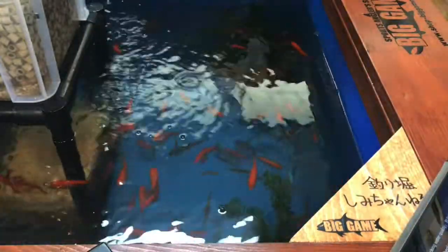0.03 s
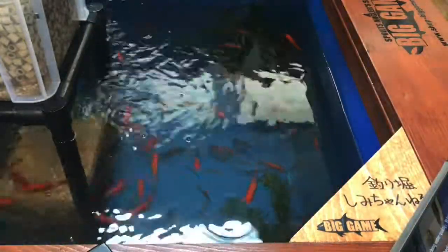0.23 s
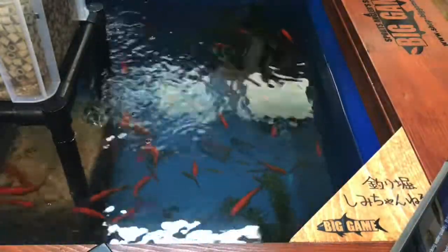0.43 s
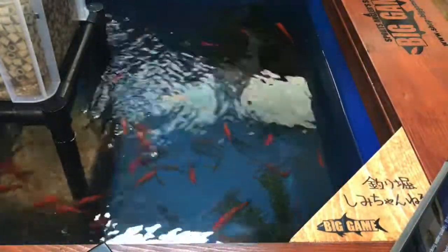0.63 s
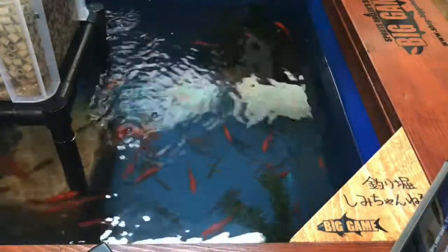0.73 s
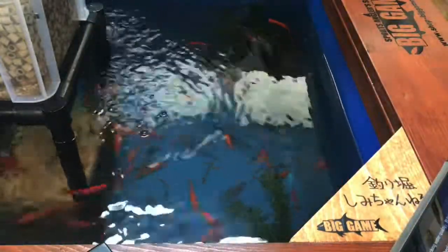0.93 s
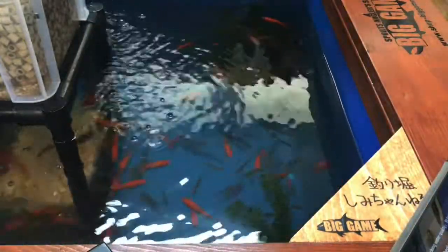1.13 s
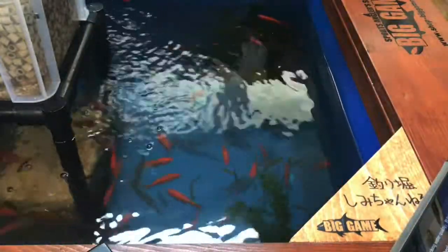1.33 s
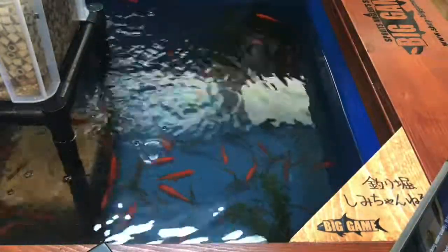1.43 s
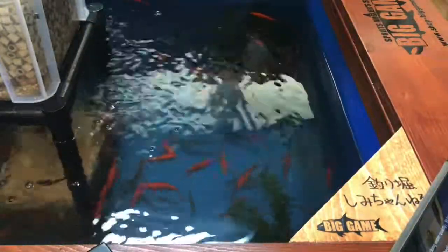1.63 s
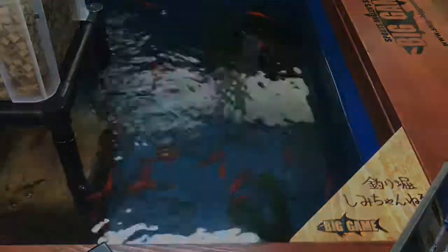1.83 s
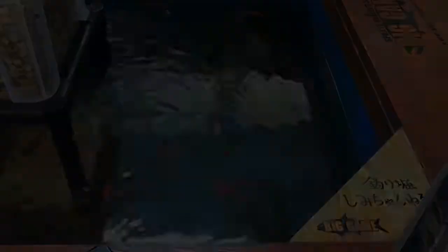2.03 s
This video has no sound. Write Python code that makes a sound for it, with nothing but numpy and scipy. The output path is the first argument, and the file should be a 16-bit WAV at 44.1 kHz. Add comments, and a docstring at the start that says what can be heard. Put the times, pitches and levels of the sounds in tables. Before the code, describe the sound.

Water trickles softly from a filter into an indoor fish pond, with a light splashy rush in the first 0.3 seconds. Fine fizz, ticking droplets and small plinking bubbles continue throughout, over churning water and a pump's steady low hum and faint buzz. A few deeper gurgles come between 1.0 and 1.3 seconds. Everything then fades, dying away at about 2.1 seconds.

```python
"""At an indoor fish pond, water trickles from a filter onto the surface.
A mains-driven pump hums and its housing buzzes at harmonics of the supply, over the tank's low rumble.
Water churns in the filter and spills with a broad rush and a fine fizz. Droplets tick on impact, and
trapped bubbles ring as damped oscillators: small ones plink, big ones gurgle. The room adds a short
reverberation, and the whole sound fades away at the end."""
import sys
import numpy as np
from scipy import signal
from scipy.fft import rfft, irfft, next_fast_len
from scipy.io import wavfile
from scipy.ndimage import map_coordinates

SR = 44100
rng = np.random.default_rng(int(sys.argv[2]) if len(sys.argv) > 2 else 0)


def dump_mix(stems):
    """Bounce the given channels to the path in sys.argv[1] as a 16-bit WAV at rate SR."""
    frames = np.atleast_2d(stems).T  # one column per channel
    limited = np.clip(frames, -1, 1)  # hard clip at full scale
    pcm = np.round(limited * 32767).astype(np.int16)
    wavfile.write(sys.argv[1], SR, pcm)


N = 92610
T = np.arange(N) / SR
MAINS_HZ = 50.03


def amp(db):
    """Amplitude ratio of a level in decibels."""
    return 10 ** (np.asarray(db) / 20)


def unit(x):
    """Normalisation to rms 1."""
    return x / np.sqrt(np.mean(x ** 2) + 1e-20)


def along(points, hz):
    """Interpolation of (frequency, value) points on a logarithmic frequency axis."""
    f, v = np.transpose(points)
    return np.interp(np.log(hz + 1), np.log(f + 1), v)


def wobble(knots_per_s):
    """Smooth random modulation: a spline through Gaussian values."""
    return map_coordinates(rng.standard_normal(int(N * knots_per_s / SR) + 4), [T * knots_per_s])


def filtered(x, response):
    """Linear filtering: the spectrum of x times a frequency response."""
    size = next_fast_len(N + SR // 2)
    return irfft(rfft(x, size) * response(np.fft.rfftfreq(size, 1 / SR)), size)[:N]


def coloured(x, spectrum):
    """Spectral shaping of x, returned at rms 1."""
    return unit(filtered(x, lambda hz: amp(along(spectrum, hz))))


def bubbles(onset_s, db, hz, cycles, attack_s, samples):
    """Bubble resonance: sines that decay 60 dB in `cycles` periods while their pitch rises 7.1 %."""
    t = np.arange(samples) / SR
    age = t * hz[:, None] / cycles
    ring = np.sin(2 * np.pi * hz[:, None] * t * (1 + 0.071 * np.minimum(age, 1) / 2))
    ring *= amp(db[:, None] - 60 * age) * (1 - np.exp(-t / attack_s))
    where = np.round(onset_s * SR).astype(int)[:, None] + np.arange(samples)
    return np.bincount(where.ravel(), ring.ravel(), N)[:N]


def swarm(per_s, low_hz, high_hz, spread_db, cycles, samples):
    """Superposition of bubbles at random times and pitches, most of them weak; rms 1."""
    when, pitch, strength = rng.random((int(per_s * N / SR), 3)).T
    db = -spread_db * np.log(np.maximum(strength, .01))
    hz = low_hz * (high_hz / low_hz) ** pitch
    return unit(bubbles(when * N / SR, db, hz, cycles, 1 / high_hz, samples))


def mains_harmonics(partials, waver_db, knots_per_s):
    """A harmonic series on the mains frequency, each partial wavering in level."""
    return np.sqrt(2) * sum(amp(db + waver_db * wobble(knots_per_s))
                            * np.sin(2 * np.pi * (order * MAINS_HZ * T + rng.random()))
                            for order, db in partials)


# reverberation time of the room (frequency [Hz], T60 [s])
ROOM_T60 = [(200, 0.39), (2500, 0.15), (8000, 0.19), (16000, 0.043)]
def room(x, wet_db):
    """Reverberation: x plus its decaying tail, which differs from one spot of the pond to the next."""
    out = x.copy()
    for centre_s in np.arange(9) / 4:
        hz, t, noise = signal.stft(rng.standard_normal(SR // 3), SR, nperseg=256)
        decay = amp(-60 * t / along(ROOM_T60, hz)[:, None])
        tail = signal.istft(noise * decay, SR, nperseg=256)[1]
        crossfade = np.clip(1 - abs(T - centre_s) * 4, 0, 1)
        out += amp(wet_db) * signal.fftconvolve(x * crossfade, tail / np.linalg.norm(tail))[:N]
    return out


# partials of the pump's hum and of its housing's buzz (harmonic number [-], level [dB])
HUM_PARTIALS = [(1, -62), (2, -49.5), (3, -80.5), (4, -75), (5, -65.5)]
BUZZ_PARTIALS = [(8, -80.5), (9, -72.5), (10, -80), (11, -75), (12, -88), (13, -73.5), (14, -71.5),
                 (15, -81.5), (16, -87.5), (17, -81), (18, -78), (19, -81.5), (20, -75), (21, -73.5),
                 (22, -76.5), (24, -75), (25, -78.5), (26, -79), (28, -75.5), (29, -85), (30, -82),
                 (34, -88.5), (36, -90), (38, -89), (46, -103), (48, -85)]
# spectrum of the tank's rumble (frequency [Hz], relative level [dB])
RUMBLE_SPECTRUM = [(20, -28), (32, -14), (44, -14.5), (59, 2), (68, -7), (82, -15.5), (118, -12.5),
                   (150, -25.5), (200, -34), (400, -51.5)]
# swell of hum and rumble together (time [s], gain [dB])
DEEP_SWELL = [(0, 0), (.2, -.5), (.6, 1.1), (.8, -1.5), (.95, 1.9), (1.08, 0), (1.19, 2.5), (1.33, -1),
              (1.7, 0), (2.1, -3.5)]
def pump():
    """Forced vibration: pump and housing sound at mains harmonics over the rumble of the tank."""
    rumble = amp(-52) * coloured(rng.standard_normal(N), RUMBLE_SPECTRUM)
    hum = mains_harmonics(HUM_PARTIALS, waver_db=0.53, knots_per_s=4.9)
    buzz = mains_harmonics(BUZZ_PARTIALS, waver_db=2.5, knots_per_s=7.15)
    swell = amp(np.interp(T, *np.transpose(DEEP_SWELL)))
    return swell * (hum + rumble) + buzz


# spectrum of the water in the filter (frequency [Hz], relative level [dB])
CHURN_SPECTRUM = [(100, -24), (170, 1), (235, 1), (300, -8), (410, -5), (510, 1), (620, -1.5), (780, -5.5),
                  (1080, -4), (1450, -4.5), (1750, -12.5), (2100, -18), (4000, -21), (16000, -88)]
def churn():
    """Amplitude modulation: the pump's stroke pulses the noise and low bubbles of churning water."""
    gurgle = swarm(per_s=500, low_hz=246.7, high_hz=1688, spread_db=0.5, cycles=18.5, samples=2500)
    stroke = amp(4.2 * np.cos(np.pi * MAINS_HZ * T) ** 10 + 0.85 * wobble(16))  # once a mains cycle
    water = rng.standard_normal(N) + amp(-15) * gurgle
    return amp(-60) * coloured(stroke * water, CHURN_SPECTRUM)


# envelope of the splashing (time [s], level [dB])
WASH_ENVELOPE = [(0, -70), (.1, -64.5), (.26, -67), (.45, -73), (.62, -72), (.88, -73), (1.2, -76),
                 (2.1, -73)]
# its spectrum (frequency [Hz], relative level [dB])
WASH_SPECTRUM = [(800, -11), (1800, -4.5), (3500, -2), (6700, 1), (9000, -4), (16000, -13.5)]
def wash():
    """Broadband noise of water spilling onto the surface, strongest near the start."""
    level_db = np.interp(T, *np.transpose(WASH_ENVELOPE)) + 1.36 * wobble(30)
    return amp(level_db) * coloured(rng.standard_normal(N), WASH_SPECTRUM)


# strength of the spray (time [s], fizz gain [dB], spatter gain [dB])
SPRAY_GAINS = [(0, 1, -2), (.15, .5, -3), (.4, 0, 1), (.6, -2.5, 1.5), (1.0, -1.5, 1), (1.3, -1.5, 2),
               (1.6, -1, 0.5), (2.1, -2, -0.5)]
# spectrum of its fizz (frequency [Hz], relative level [dB])
FIZZ_SPECTRUM = [(700, -11), (2000, -5.5), (2500, 5), (2850, -9), (3400, -4), (4200, -8.5), (5400, -7),
                 (6700, -3.5), (7600, -9), (8600, 1.5), (10400, -4.5), (11800, 2.5), (13300, 3.5),
                 (14400, 4.5), (15800, 4)]
def fizz():
    """Incoherent summation: countless tiny bubbles burst in the smooth hiss of fine spray."""
    times, gain_db, _ = np.transpose(SPRAY_GAINS)
    hiss = amp(-61) * coloured(rng.standard_normal(N), FIZZ_SPECTRUM)
    pops = swarm(per_s=1300, low_hz=3970, high_hz=15300, spread_db=2.5, cycles=12.7, samples=160)
    envelope = amp(np.interp(T, times, gain_db) + 0.28 * wobble(15) + 0.65 * wobble(110))
    return envelope * (hiss + amp(-69.5) * coloured(pops, FIZZ_SPECTRUM))


def tick(db, hz, rise_s=0.00027, t60_s=0.0078, width_hz=1600, splat=0.17):
    """Impact transient of one droplet: a noise burst with a resonance peak and a weaker broad splat."""
    t, f = np.arange(512) / SR, np.fft.rfftfreq(512, 1 / SR)
    resonance = 1 / (1 + (2 * (f - hz) / width_hz) ** 2)
    colour = (resonance + splat) * f / (f + 2500)
    noise = unit(irfft(rfft(rng.standard_normal(len(t))) * colour))
    envelope = (1 - np.exp(-t / rise_s)) ** 2 * amp(-60 * t / t60_s)
    return amp(db) * envelope / envelope.max() * noise


# loud droplets striking the surface (time [s], level [dB], frequency [Hz])
DROPLET_IMPACTS = [(0.047, -50, 14000), (0.2562, -50, 9500), (0.258, -49, 8800), (.728, -51, 14300),
                   (.8305, -53, 14000), (.8654, -50, 13200), (.8869, -51.5, 13500), (.9318, -56, 14500),
                   (0.977, -55, 12200), (1.0555, -46, 13600), (1.144, -58, 12070), (1.2875, -50, 12900),
                   (1.4765, -52, 9000), (1.492, -50, 14200), (1.5425, -49.5, 9100), (1.667, -52, 11100),
                   (1.797, -55.5, 11100)]
def droplets(per_s=120, low_hz=7660, high_hz=15350):
    """Shot noise: a dense random spatter of small impacts, with a few loud ones among them."""
    times, _, gain_db = np.transpose(SPRAY_GAINS)
    when, strength, pitch = rng.random((int(per_s * N / SR), 3)).T
    onset_s = when * N / SR
    level_db = -65 + np.interp(onset_s, times, gain_db) - 2 * np.log(np.maximum(strength, .05))
    spatter = zip(onset_s, level_db, low_hz + pitch * (high_hz - low_hz))
    out = np.zeros(N + SR)
    for start, db, hz in [*DROPLET_IMPACTS, *spatter]:
        burst = tick(db, hz)
        out[round(start * SR):][:len(burst)] += burst
    return room(out[:N], wet_db=-8.5)


# small bubbles that plink and big ones that gurgle (time [s], level [dB], frequency [Hz])
SMALL_BUBBLES = [(0.044, -54, 2477), (.058, -58.5, 1670), (0.216, -51, 2540), (.345, -53, 5140),
                 (.378, -59, 2500), (.574, -60, 4350), (.6404, -48.5, 3390), (0.641, -55, 2410),
                 (0.7695, -56, 2426), (0.885, -56, 2600), (0.9106, -47.5, 4750), (1.0271, -53, 2410),
                 (1.041, -55.5, 2370), (1.265, -56.5, 3550), (1.33, -49, 7040), (1.375, -51, 6100),
                 (1.448, -56, 3570), (1.5678, -58, 2436), (1.724, -56, 3400), (1.871, -52, 3350),
                 (1.905, -53.5, 2394), (1.908, -52, 5400), (2.026, -50, 4450)]
BIG_BUBBLES = [(.135, -55, 560), (1.022, -49, 498), (1.18, -50, 507), (1.24, -53, 646)]
def trickle():
    """Air entrainment: falling water traps bubbles that ring, the larger the lower."""
    onset_s, db, hz = np.transpose(SMALL_BUBBLES)
    ringing = dict(cycles=75.4, attack_s=0.0011, samples=2500)
    plinks = bubbles(onset_s, db, hz, **ringing)
    for _ in range(3):  # each plink sheds weaker satellite bubbles near its own pitch
        lag_s = 0.012 * rng.random(len(hz))
        satellite_hz = hz * np.exp(0.0856 * rng.standard_normal(len(hz)))
        plinks += bubbles(onset_s + lag_s, db - 9.5, satellite_hz, **ringing)
    faint = swarm(per_s=160, low_hz=2184, high_hz=7660, spread_db=3.5, cycles=41, samples=1000)
    gurgles = bubbles(*np.transpose(BIG_BUBBLES), cycles=26, attack_s=0.0025, samples=4000)
    return room(plinks + amp(-79.5) * faint + gurgles, wet_db=-2.5)


def scene():
    """Superposition of pump and water, in mono."""
    return (pump() + churn() + wash() + fizz() + droplets() + trickle())[None]


# closing fade of the whole sound (time [s], gain [dB])
FADE_OUT = [(1.22, -0.5), (1.55, -4.5), (1.8, -8.5), (1.99, -13), (2.05, -18), (2.1, -24.5)]
def record(dry):
    """Attenuation and band limiting: the level fades, and a low-pass filter cuts the highest treble."""
    fade = amp(np.interp(T, *np.transpose(FADE_OUT)))
    return filtered(dry[0] * fade, lambda hz: hz < 15780)[None]


dry = scene()
out = record(dry)
dump_mix(out)
```